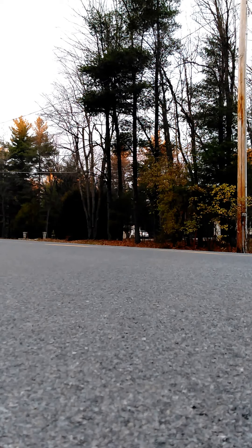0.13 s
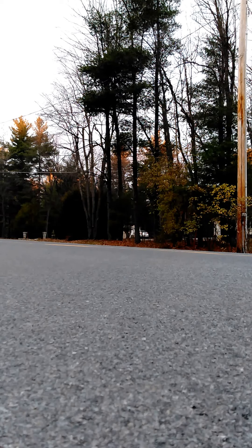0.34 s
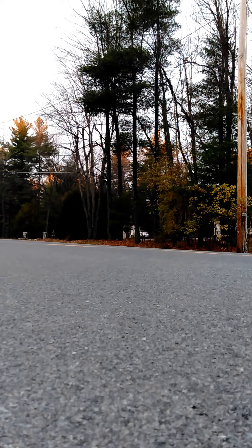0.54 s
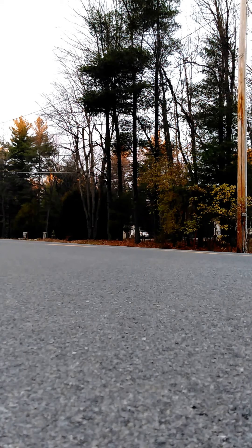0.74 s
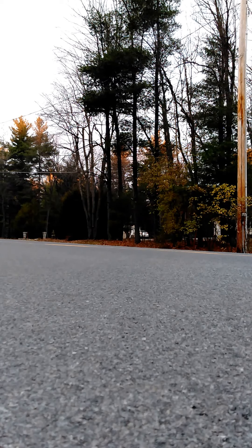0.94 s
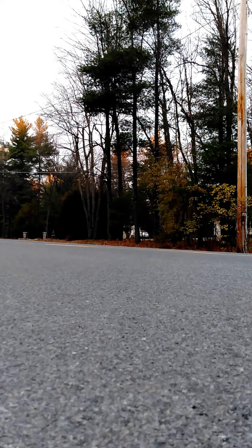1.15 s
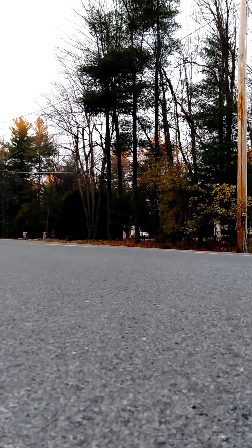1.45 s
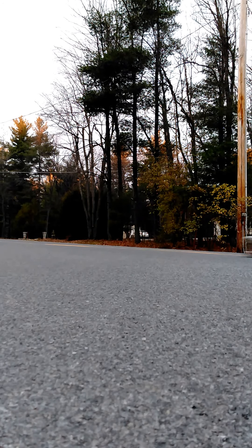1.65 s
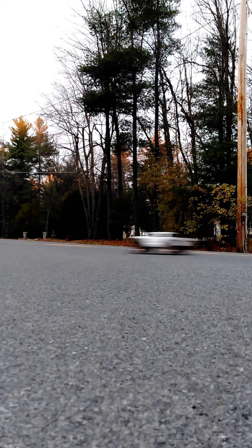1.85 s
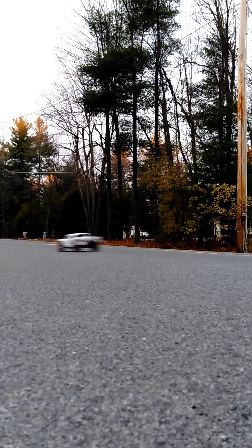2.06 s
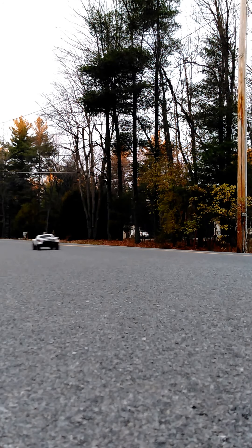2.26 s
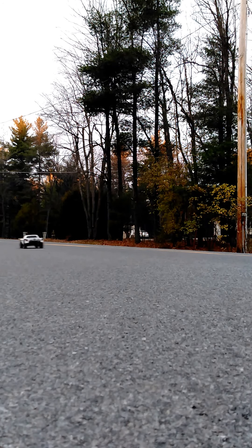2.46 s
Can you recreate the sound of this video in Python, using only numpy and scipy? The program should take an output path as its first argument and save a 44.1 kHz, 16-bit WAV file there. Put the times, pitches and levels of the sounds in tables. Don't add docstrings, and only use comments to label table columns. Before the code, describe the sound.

Shrill gear whine of a toy electric truck, faint bursts first, then a loud close pass with tyre hiss

```python
import sys
import numpy as np
from scipy import signal
from scipy.fft import rfft, irfft, next_fast_len
from scipy.io import wavfile
from scipy.ndimage import uniform_filter1d, map_coordinates

SR = 44100
rng = np.random.default_rng(int(sys.argv[2]) if len(sys.argv) > 2 else 0)


def ratio_of_db(decibels):
    return 10 ** (np.asarray(decibels, float) / 20)


def dump_mix(stems):
    frames = np.atleast_2d(stems).T
    limited = np.clip(frames, -1, 1)
    pcm = np.round(limited * 32767).astype(np.int16)
    wavfile.write(sys.argv[1], SR, pcm)


N = 114660
T = np.arange(N) / SR
TOP_HZ = 14280

# [t/s, level/dB, gear
# tone f/Hz, whine over rattle/dB, hiss over rattle/dB]
WEAVE = [
    (0, -31.5, 1846.5, 3.5, 4),
    (.07, -29.5, 1819, -0.5, 0.5),
    (0.124, -32, 1680, -7, 2.5),
    (0.346, -40, 1690, -3.5, 1.5),
    (0.398, -31, 1859, 17, 0.5),
    (0.446, -34.5, 1573, 4.5, 1),
    (0.499, -32.5, 1818, 11.5, 3.5),
    (0.574, -33.5, 1681.5, 9, 0.5),
    (.615, -46, 1399, -17, 1),
         (0.646, -44.5, 1309, 13, 5),
    (0.684, -32.5, 1530, 0.5, -5.5),
    (0.715, -44, 1513, -23, 8.5),
    (0.762, -49.5, 1390, 6, 12),
    (0.809, -38.5, 1400, -6, 10.5),
    (0.861, -45, 1426, -24, 13),
    (0.878, -53, 1518, 5, 8),
    (0.931, -37, 1494, 1.5, -3.5),
    (0.982, -38, 1300, -4, -6),
         (1.004, -60.5, 1149, -7, 10),
    (1.036, -44, 1094, -14, 7),
    (1.04, -32.5, 1146, -31, -14),
    (1.069, -29, 1255, 5, -5),
    (1.104, -37, 1372, -3.5, -5.5),
    (1.142, -52, 1300, 3, 4.5),
]
COAST = [
    (1.188, -43, 1065, -18, 0),
    (1.213, -33, 1049, -16, -5),
    (1.255, -40, 1037, -13, -1.5),
    (1.28, -46, 1021, -8, 5.5),
    (1.325, -43.5, 1030, 1, 3),
    (1.385, -43.5, 1022, 4.5, 1.5),
    (1.43, -45, 1006, 8, 7),
    (1.456, -51.5, 999.6, -2.5, 6.5),
]
# [t/s, gear tone f/Hz, level/dB, whine over rattle/dB, hiss over rattle/dB]
LAUNCH = [
    (1.478, 1129, -31.5, -0.5, -8),
    (1.492, 1406, -28, 12.5, 3),
    (1.51, 1445, -27.5, 12, 3),
    (1.526, 1620, -22.5, 12, -1),
    (1.56, 1603, -22, 10.5, -3),
    (1.592, 1722, -21, 10, -5),
    (1.608, 1998, -21, 7.5, 1),
    (1.66, 2030, -20, 8, -3.5),
]
CLOSEST = [
    (1.68, 1942, -20, 7.7, 1),
    (1.7, 2007, -21.5, 13, 2),
    (1.718, 2106, -23.5, 7, 1),
    (1.735, 2137, -22, 8, 0),
    (1.75, 2090, -21, 7, 0),
]
PAST = [
    (1.768, 2068, -21.5, 10, 2),
    (1.796, 2119, -21.5, 6.5, 2.5),
    (1.834, 2208, -24.5, 12.5, 7),
    (1.864, 2197, -21.5, 9, 3.5),
    (1.894, 2414, -23, 11, 2),
    (1.932, 2356, -25.5, 11.5, 7),
    (1.951, 2098, -23.5, -1, 6),
    (1.972, 1850, -28.5, 0, 6),
    (1.99, 1740, -28, -17, 3),
]
BLIP = [
    (2.002, 1777, -27, -2, 7.2),
    (2.008, 1801, -27.5, 13, 5.7),
    (2.021, 1886, -29.5, 15, 12.2),
    (2.048, 2040, -30, 9, 8),
    (2.068, 1942, -30.5, -19, 6),
]
# [t/s, level/dB, gear tone f/Hz, whine over rattle/dB, hiss over rattle/dB]
AWAY = [
    (2.152, -30, 1775, -27, 6.5),
    (2.271, -33, 1510, -35, 5.9),
    (2.31, -32, 1400, -10, 12.5),
    (2.339, -35.5, 1360, -14, 8),
    (2.369, -33, 1320, -4, 11.9),
    (2.469, -37, 1604, -4, 11.5),
    (2.6, -34, 1647, 6, 9.4),
]
TURNED_S, TURNING_S = 1.46, .01

# [multiple of the gear tone, front-on level/dB, side-on level/dB]
ORDERS = [(.375, -45, -12), (.5, -13, -12), (1, -0.5, -10.5), (1.5, -19, -27), (2, -7, -1.5),
          (3, -12.5, -23), (3.5, -13, -16), (4, -9.5, -2), (5, -18.5, -27), (6, -41, -21)]
FLUTTER_HZ, FLUTTER_SHARE, FRONT_SHARE, SIDE_LEAST_SHARE = 50, .22, .1, .45
SKIRT, SKIRT_FASTER, JITTER = .24, 5, .01
DROPS_OUT_S, DROPS_DB_PER_S = 1.8, 400
# [f/Hz, width/Hz, level/dB]
SHELL = [(2950, 1090, 7), (3830, 160, 1.5), (4138, 340, 2.5), (4530, 290, -2.5), (7050, 660, -6.5),
         (8600, 430, 13.5), (9490, 730, 7), (10700, 520, 16), (12000, 2100, 15)]
# [f/Hz, width/Hz, level/dB]
PANELS = [(785, 115, 6), (2280, 240, 0)]
# [f/Hz, width/Hz, level/dB]
NOSE = [(1390, 160, 0), (1620, 320, -1), (2160, 200, 10.5)]
# [f/Hz, width/Hz, level/dB]
FLANK = [(1135, 235, 3)]
# [f/Hz, width/Hz, level/dB]
RING = [(8630, 480, 1), (12170, 1100, -7)]
SHELL_FLOOR_DB, RING_DB = -16, -18.5
ECHO_DB, ECHO_T60 = -9, 0.12

# [f/Hz, width/Hz, front-on level/dB, side-on level/dB]
CHASSIS = [(321, 140, -6.5, -7.5), (748, 180, -11.5, -9), (1400, 85, -10, -31), (2215, 580, -5, -11),
           (2794, 270, 0, -8.5), (3076, 99, 6, -14), (3353, 106, -0.5, -7.5), (3710, 1170, -9, -8.5),
           (5340, 2300, -5.5, -4.5)]
RATTLE_DB, LUMPS_DB, LUMP_HZ = -5.5, 0.5, 118.4
RATTLE_FLOOR_DB, RATTLE_PATCHY_DB, RATTLE_TOP_HZ = -16, 3, 4000
# [f/Hz, level/dB per Hz]
TYRES = [(2940, -15), (5000, -10.5), (5670, -12), (6210, -2), (7650, -1), (10100, -1.5), (12400, -8.5),
         (14100, -24.5)]
HISS_DB, GRIT_DB, GRIT_HZ, HISS_PATCHY_DB = -9, 0.5, 59.8, 1.6
LEAVING_S, THIN_HZ, THIN_DB_PER_S = 2.35, 1300, 46

# [f/Hz, level/dB per Hz]
STREET = [(53, -30), (90, -7), (479, -9.5), (686, 3), (1320, -17.5), (1470, -10.5), (2060, -3), (2490, -70),
          (14100, -12.5)]
STREET_DB, STREET_PATCHY_DB = -46.5, 1.5
# [f/Hz, level/dB per Hz]
WIND = [(20, -40), (38, -14), (60, 0), (105, -8), (150, -30), (220, -90)]
# [t/s, peak level/dB]
BUMPS = [
    (0.281, -55),
    (0.508, -56),
    (0.64, -60),
    (0.82, -54),
    (0.911, -39.5),
    (1.159, -51),
    (1.678, -46),
    (1.799, -43),
    (2.219, -48),
    (2.496, -57),
]
WIND_DB, WIND_RIGHT_DB = -68, 15
BUMP_S, BUMP_HZ, BUMP_SAG = 0.012, 69.4, 22
# [t/s, peak level/dB, f/Hz, t60/s]
TICKS = [
    (0.7292, -24, 7500, 0.034),
    (1.465, -31, 8600, 0.023),
    (1.49, -20, 2404, 0.3),
]

# [f/Hz, left over right/dB]
FAR_SIDES = [(60, 11), (130, 3.5), (280, -0.5), (610, 2), (1330, 1.5), (2900, 2.5), (6290, 4), (13700, 14)]
# [f/Hz, left over right/dB]
NEAR_SIDES = [(60, -2), (130, 0), (280, -1), (610, 2), (1330, -0.5), (2900, 0), (6290, 7), (13700, 23.5)]
# [f/Hz, likeness 0-1]
ALIKE = [(60, 0.6), (180, 1), (600, 0.94), (1100, 0.87), (2000, 0.77), (4620, 0.66), (13700, 0.056)]
LEAD_S = 2e-5
# [from t/s, to t/s, f/Hz]
MUTED = [(.02, .07, 5150), (.09, .22, 4300), (.21, .28, 5150), (.26, .41, 5000), (.28, .36, 4150),
         (.41, .49, 4200), (.5, .71, 5520), (.58, .66, 4720), (.76, .87, 5400), (.79, .83, 4520),
         (.81, .85, 4150), (.84, .99, 3650), (.93, 1.14, 5850), (1.16, 1.2, 4800), (1.21, 1.29, 5850),
         (1.28, 1.4, 3780), (1.32, 1.45, 5750), (1.56, 1.72, 4520), (1.6, 1.66, 6250), (1.74, 1.8, 6750),
         (1.79, 1.87, 4880), (1.86, 1.89, 5080), (2.0, 2.03, 2550)]
MUTED_WIDTH_HZ, MUTED_EDGE_S = 190, .008


def unit(x):
    return x / np.sqrt(np.mean(x ** 2) + 1e-20)


def along(points, hz):
    f, v = np.transpose(points)
    return np.interp(np.log(hz + 1), np.log(f + 1), v)


def wobble(rate_hz):
    return map_coordinates(rng.standard_normal(N // 5), [T * rate_hz])


def filtered(x, response):
    m = next_fast_len(N + 8192)
    return irfft(rfft(x, m) * response(np.fft.rfftfreq(m, 1 / SR)), m)[..., :N]


def peaks(table, hz, floor_db):
    power = ratio_of_db(2 * floor_db)
    for centre_hz, width_hz, db in table:
        power = power + ratio_of_db(2 * db) / (1 + (2 * (hz - centre_hz) / width_hz) ** 2) ** 2
    return np.sqrt(power)


def noise(gain, patchy_db):
    z = signal.stft(rng.standard_normal((2, N)), nperseg=256)[2]
    patches = uniform_filter1d(rng.standard_normal(z.shape[1:]), size=4, axis=0)
    patches = unit(uniform_filter1d(patches, size=10, axis=1))
    pair = signal.istft(z * ratio_of_db(patchy_db * patches), nperseg=256)[1][:, :N]

    def mid_side_gain(hz):
        angle = np.arccos(np.clip(along(ALIKE, hz), 0, 1)) / 2
        return gain(hz) * [np.cos(angle), np.sin(angle)]

    mid, side = filtered(pair, mid_side_gain)
    return unit(np.array([mid + side, mid - side]))


def ports(x, sides):
    sign = np.array([[.5], [-.5]])
    return filtered(x, lambda hz: ratio_of_db(sign * along(sides, hz)) * np.exp(2j * np.pi * sign * hz * LEAD_S))


def drive():
    def tone_first(rows):
        return [(s, hz, db, whine_db, hiss_db) for s, db, hz, whine_db, hiss_db in rows]

    rows = tone_first(WEAVE + COAST) + LAUNCH + CLOSEST + PAST + BLIP + tone_first(AWAY)
    s, *columns = np.transpose(rows)
    return [np.interp(T, s, column) for column in columns]


def flutter(rate_hz):
    return (wobble(rate_hz) + 1j * wobble(rate_hz)) / np.sqrt(2)


def whine(tone_hz, turned):
    phase = 2 * np.pi * np.cumsum(tone_hz * (1 + JITTER * wobble(60))) / SR
    out = np.zeros(N)
    for k, front_db, side_db in ORDERS:
        hz = k * tone_hz
        front_share = FRONT_SHARE * k ** 3
        side_share = max(FLUTTER_SHARE * k, SIDE_LEAST_SHARE)
        share = np.minimum((1 - turned) * front_share + turned * side_share, .9)
        carrier = np.sqrt(1 - share) + np.sqrt(share) * flutter(FLUTTER_HZ * max(k, 1))
        carrier = carrier + SKIRT * np.sqrt(k) * flutter(SKIRT_FASTER * FLUTTER_HZ * k)

        shell = peaks(PANELS + SHELL, hz, SHELL_FLOOR_DB)
        shell = shell + (1 - turned) * peaks(NOSE, hz, -np.inf) + turned * peaks(FLANK, hz, -np.inf)
        drop_db = (k < .5) * DROPS_DB_PER_S * np.clip(T - DROPS_OUT_S, 0, 1)
        gain = ratio_of_db(front_db + turned * (side_db - front_db) - drop_db) * shell
        out += gain * (hz < TOP_HZ) * np.real(carrier * np.exp(1j * k * phase))
    return out


def echo(teeth):
    tail = rng.standard_normal((2, SR // 5)) * ratio_of_db(-60 * T[:SR // 5] / ECHO_T60)
    return signal.fftconvolve(teeth[None], tail / np.linalg.norm(tail[0]), axes=1)[:, :N]


def rattle(turned):
    def body(table):
        def gain(hz):
            low_cut = hz ** 2 / (hz ** 2 + 300 ** 2)
            return peaks(table, hz, RATTLE_FLOOR_DB) * low_cut / (1 + (hz / RATTLE_TOP_HZ) ** 4)
        return noise(gain, RATTLE_PATCHY_DB)

    front = [(hz, width, db) for hz, width, db, _ in CHASSIS]
    side = [(hz, width, db) for hz, width, _, db in CHASSIS]
    return (1 - turned) * body(front) + turned * body(side)


def tyre_hiss():
    return noise(lambda hz: ratio_of_db(along(TYRES, hz)), HISS_PATCHY_DB)


def truck():
    tone_hz, level_db, whine_db, hiss_db = drive()
    turned = np.clip((T - TURNED_S) / TURNING_S, 0, 1)
    teeth = ratio_of_db(level_db + whine_db - 10.0) * whine(tone_hz, turned)
    lumps_db = LUMPS_DB * wobble(LUMP_HZ) + 0.3 * wobble(25.1)
    grit_db = GRIT_DB * wobble(GRIT_HZ) + 1.38 * wobble(400)

    both = teeth + ratio_of_db(ECHO_DB) * echo(teeth)
    both = both + ratio_of_db(level_db + RATTLE_DB + lumps_db) * rattle(turned)
    both = both + ratio_of_db(level_db + HISS_DB + hiss_db + grit_db) * tyre_hiss()
    both = both + turned * ratio_of_db(level_db + whine_db + RING_DB) * shell_ring()
    both = thinned(both)
    return ports((1 - turned) * both, FAR_SIDES) + ports(turned * both, NEAR_SIDES)


def street():
    background = noise(lambda hz: ratio_of_db(along(STREET, hz)), STREET_PATCHY_DB)
    return ratio_of_db(STREET_DB) * ports(background, FAR_SIDES)


def wind():
    rumble = unit(filtered(rng.standard_normal((2, N)), lambda hz: ratio_of_db(along(WIND, hz))))
    out = ratio_of_db(WIND_DB + 5.0 * wobble(23.2)) * rumble
    for (s, db), turns in zip(BUMPS, rng.random((len(BUMPS), 2))):
        t = T - s - .015
        swing = np.cos(2 * np.pi * (BUMP_HZ * t * (1 - BUMP_SAG * t / 2) + turns[:, None]))
        out = out + ratio_of_db(db) * np.exp(-.5 * (t / BUMP_S) ** 2) * swing
    return out * ratio_of_db([[-WIND_RIGHT_DB / 2], [WIND_RIGHT_DB / 2]])


def grit():
    out, t = np.zeros((2, N + 4000)), T[:4000]
    thud = np.sin(2 * np.pi * 850 * t) + 0.67 * np.sin(2 * np.pi * 500 * t)
    thud = 0.24 * ratio_of_db(-60 * t / 0.083) * thud
    for s, db, hz, t60 in TICKS:
        burst = rng.standard_normal((3, 4000))
        b, a = signal.butter(1, [hz * 0.87, min(hz * 1.06, 20000)], "band", fs=SR)
        crack = signal.lfilter(b, a, burst[0] + 3.0 * burst[1:])
        start = round(s * SR)
        out[:, start:start + 4000] += ratio_of_db(db) * (ratio_of_db(-60 * t / t60) * crack + (s < 1) * thud)
    return out[:, :N]


def shell_ring():
    return noise(lambda hz: peaks(RING, hz, -np.inf), patchy_db=4)


def thinned(x):
    low = filtered(x, lambda hz: 1 / (1 + (hz / THIN_HZ) ** 6))
    return x - low * (1 - ratio_of_db(-THIN_DB_PER_S * np.clip(T - LEAVING_S, 0, 1)))


def scene():
    return truck() + grit() + street() + wind()


def muted(x):
    for start, end, centre_hz in MUTED:
        gate = np.clip(np.minimum(T - start, end - T) / MUTED_EDGE_S, 0, 1)
        band = filtered(x, lambda hz: 1 / (1 + (2 * (hz - centre_hz) / MUTED_WIDTH_HZ) ** 6))
        x = x - gate * band
    return x


def band_limit(x):
    return signal.sosfilt(signal.butter(12, 14270, fs=SR, output="sos"), x)


def record(dry):
    limited = filtered(dry, lambda hz: hz < TOP_HZ)
    mix = muted(np.clip(limited, -1, 1))
    return band_limit(mix)


dry = scene()
out = record(dry)
dump_mix(out)
```